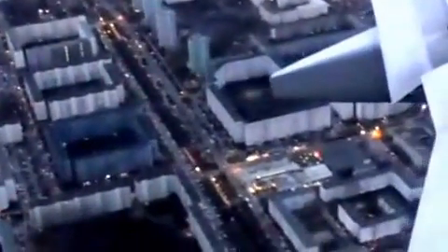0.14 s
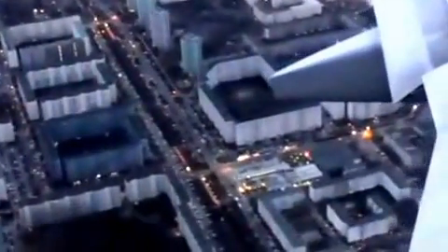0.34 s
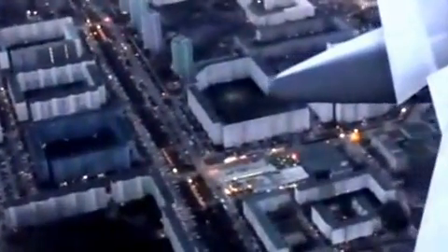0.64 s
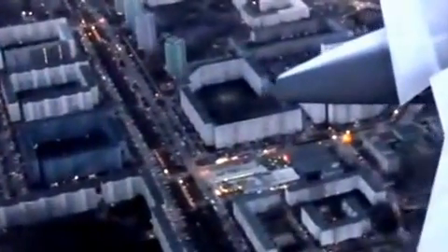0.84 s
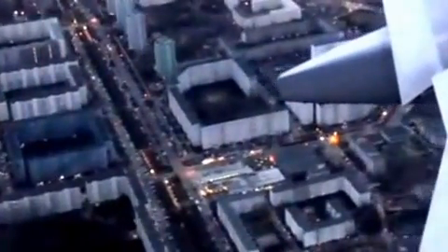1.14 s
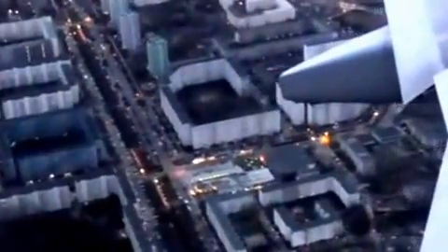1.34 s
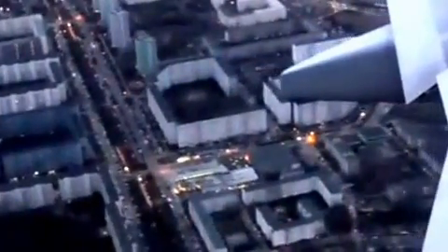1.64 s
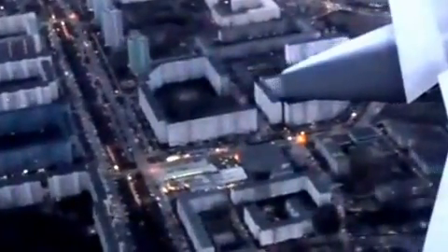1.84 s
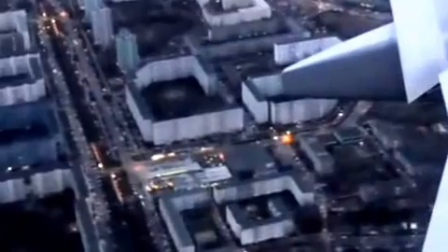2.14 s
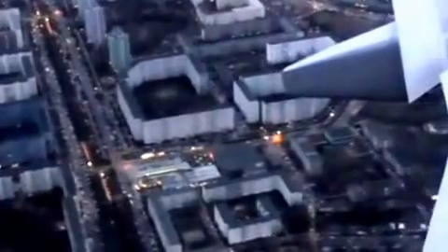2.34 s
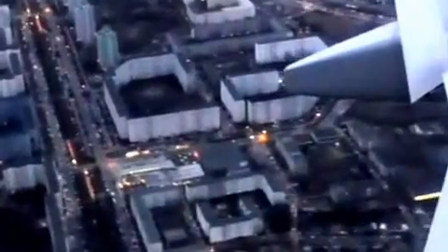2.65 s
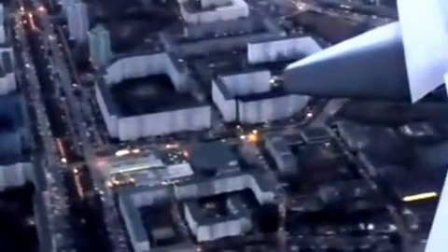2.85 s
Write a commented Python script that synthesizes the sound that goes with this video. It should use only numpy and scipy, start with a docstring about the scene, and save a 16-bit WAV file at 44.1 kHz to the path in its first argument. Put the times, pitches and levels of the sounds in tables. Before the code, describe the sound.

Low airliner cabin roar of engines and airflow, one sharp knock early, then faint plastic ticks

```python
"""Engines and airflow fill a descending jet airliner, close to a window, with a deep steady roar:
coloured noise with narrow resonances, swelling slightly in three bands.
Something hard clacks once nearby: decaying modes, a crack of noise and a short cabin tail.
Turning machinery adds faint wavering sines, and small plastic ticks sweep quickly upward.
The vents add a smooth faint hiss of treble noise."""
import sys
import numpy as np
from scipy import signal
from scipy.fft import rfft, irfft
from scipy.io import wavfile
from scipy.ndimage import uniform_filter1d

SR = 44100
rng = np.random.default_rng(int(sys.argv[2]) if len(sys.argv) > 2 else 0)


def wav_record(signal):
    """Record a signal, one row per channel, as 16-bit PCM in the file named by sys.argv[1]."""
    frames = np.transpose(np.atleast_2d(signal))
    bounded = np.clip(frames, -1, 1)
    # unit amplitude maps onto the largest positive 16-bit level
    quanta = np.round(bounded * 32767).astype(np.int16)
    wavfile.write(sys.argv[1], SR, quanta)


N = 131859
TIME = np.arange(N) / SR  # s
BIN_HZ = np.maximum(np.arange(N // 2 + 1) * SR / N, 1)  # kept above zero for the logarithm

# Relative spectrum of engine and airflow noise through the hull: [f/Hz, density level/dB per Hz]
ROAR_SPECTRUM = [(28, -38), (45, -25), (62, -19), (78, -8), (125, -0.5), (200, 0.14), (236, -2.5),
                 (295, -3.5), (335, -8), (370, -13.5), (480, -18.5), (570, -19.5), (630, -23), (860, -27),
                 (1120, -28.5), (1230, -33.5), (1380, -32.5), (1600, -36), (1860, -41.5), (2250, -44.5),
                 (2600, -51.5), (2900, -62.5)]
# Narrow bands in which panels and ducts resound: [f/Hz, half-amplitude width/Hz, level/dB]
RESONANCES = [(169.8, 15, -30.5), (208.3, 6.8, -32), (281, 34, -25.5), (503, 4.9, -46), (700, 14, -45.5),
              (901, 12, -51.5), (998, 36, -46.5), (2086, 150, -53), (3420, 160, -64)]
# Slow level of the roar's bass: [t/s, level/dB]
BASS_SWELL = [(0, 3), (0.13, -3.3), (0.25, 1.1), (0.42, -0.7), (0.8, -0.5), (0.98, 1.9), (1.28, -0.4),
              (1.48, -1), (1.66, 1), (1.78, -1.5), (1.92, 1.5), (2.2, -0.3), (2.75, -1), (2.88, 1),
              (2.99, 1.5)]
# Slow level of the drone between bass and midrange: [t/s, level/dB]
DRONE_SWELL = [(0, 0), (0.35, -1.5), (1.1, -0.5), (1.3, -1.2), (1.5, 1.5), (1.7, 0.4), (1.92, 1.8),
               (2.1, -3), (2.3, 2.5), (2.5, -2.5), (2.7, 0.7), (2.99, -1.3)]
# Slow level of the roar from the midrange up: [t/s, level/dB]
MIDRANGE_SWELL = [(0, 0.2), (0.25, 0), (0.45, -0.5), (0.75, -1.5), (1.0, 0.5), (1.25, -0.6), (1.5, 1.1),
                  (1.85, 1), (2.1, -1), (2.4, -1), (2.72, 1.5), (2.99, 0)]
# Contacts of the clack, a first touch, the blow and a dying rattle: [t/s, relative level/dB]
CLACK_CONTACTS = [(0.5511, -6), (0.5523, 0), (0.5542, -1.5), (0.5576, -8), (0.5608, -6.5), (0.5655, -13),
                  (0.5695, -14), (0.5755, -21), (0.5815, -21)]
# Modes of the struck body: [f/Hz, level/dB, t60/s]
CLACK_MODES = [(670, -25, .06), (765, -27, .035), (820, -21, .055), (962, -29, .045), (1125, -32, .05),
               (1285, -25, .04), (1604, -22.5, .05), (1910, -31, .035), (2065, -31, .045), (2135, -34, .04),
               (3480, -46, .04), (5360, -44, .04), (5690, -45, .04)]
# Relative spectrum of the crack and its tail: [f/Hz, density level/dB per Hz]
CRACK_SPECTRUM = [(450, 3), (700, 7), (1100, 6), (2000, 5), (2400, -8), (2900, -9), (3500, -4.5),
                  (5200, -2), (6200, -5.5), (7800, -13), (8500, -36)]
# Tones of the turning machinery: [f/Hz, level/dB]
MACHINE_TONES = [(449, -39), (1500, -52), (2997, -74.5)]
# Small plastic ticks: [t/s, level/dB]
TICK_CONTACTS = [(1.0625, -40), (1.1005, -37), (1.1255, -35.5), (1.619, -43.5), (1.625, -42.5),
                 (1.8944, -34.5), (1.9074, -33), (1.9597, -39.5), (2.9185, -37.5)]
# Relative spectrum of the ticks: [f/Hz, density level/dB per Hz]
TICK_SPECTRUM = [(1500, 0), (2800, -1), (3600, -1.5), (4250, 2), (5200, -2), (7000, 0.5), (8400, 0),
                 (9200, -6), (10300, -11), (11000, -30)]
# Relative spectrum of the air from the vents: [f/Hz, density level/dB per Hz]
HISS_SPECTRUM = [(2000, -15.5), (2700, -2), (3800, 1.5), (5400, -0.5), (6500, -5), (8000, -11),
                 (9500, -18.5), (11000, -28), (15000, -35.5)]
# Slow level of the hiss: [t/s, level/dB]
HISS_LEVEL = [(0, -55.5), (0.4, -54), (0.8, -56), (1.1, -55), (1.65, -54), (2.15, -55), (2.45, -56.5),
              (2.99, -53)]
# Left-right correlation of the roar and hiss: [f/Hz, correlation]
CORRELATION = [(100, 0.99), (210, .99), (330, 0.98), (500, 0.88), (800, .84), (1800, 0.82), (2700, 0.65),
               (5000, 0.59), (8000, 1)]
# Left-right balance of every noise: [f/Hz, left minus right level/dB]
BALANCE = [(90, .5), (210, -0.2), (500, -0.3), (770, -3), (1200, -2), (1800, -.5), (2700, 1.5), (8000, 0)]

ROAR_DB = -14  # broad noise before the swells
DRONE_FROM_HZ, MIDRANGE_FROM_HZ = 235, 355
STEADY_OVER_S = 0.2
CRACK_DB, CRACK_T60_S = -21.5, 0.018
CLACK_TAIL_DB, CLACK_TAIL_T60_S = -39, 0.17
TONE_WANDER_HZ, TONE_FLUTTER_DB = 2.8, 2  # rms deviations
TONE_DRIFT_CORNER_HZ = 5.9
TICK_RISE_S, TICK_T60_S = 0.0006, 0.013
TICK_TAIL_DB, TICK_TAIL_T60_S = -17.5, 0.16  # tail level relative to the snap
TICK_DELAY_S_PER_HZ = 1.7e-7
TICK_CORRELATION = 0.88
STOPBAND_HZ = 15700


def roar():
    """Turbulent noise excites resonances; the level of each of three bands varies slowly."""
    correlation = over_hz(CORRELATION)
    rumble = from_db(ROAR_DB) * noise(colour(ROAR_SPECTRUM), correlation)
    for hz, width, db in RESONANCES:
        resonance_gain = 1 / (1 + ((BIN_HZ - hz) / (width / 2)) ** 2)
        rumble = rumble + from_db(db) * noise(resonance_gain, correlation)
    bass = below(rumble, DRONE_FROM_HZ)
    lows = below(rumble, MIDRANGE_FROM_HZ)
    bass_part = from_db(over_time(BASS_SWELL)) * steady(bass)
    drone_part = from_db(over_time(DRONE_SWELL)) * steady(lows - bass)
    midrange_part = from_db(over_time(MIDRANGE_SWELL)) * (rumble - lows)
    return bass_part + drone_part + midrange_part


def clack():
    """Impact: contacts excite the decaying modes of a hard body, a crack and a short cabin tail."""
    ringing = np.zeros((2, N))
    for hz, db, t60 in CLACK_MODES:
        # the phase differs slightly between left and right
        phase = rng.uniform(0, 2 * np.pi) + rng.normal(0, 0.32, (2, 1))
        envelope = from_db(db) * strikes(CLACK_CONTACTS, rise_s=0.00019, t60=t60)
        ringing += envelope * np.sin(2 * np.pi * hz * TIME + phase)
    spectrum = colour(CRACK_SPECTRUM)
    crack_envelope = strikes(CLACK_CONTACTS, rise_s=0.00032, t60=CRACK_T60_S)
    crack = from_db(CRACK_DB) * crack_envelope * noise(spectrum, correlation=0.45)
    tail_envelope = strikes(CLACK_CONTACTS, rise_s=0.019, t60=CLACK_TAIL_T60_S)
    tail = from_db(CLACK_TAIL_DB) * tail_envelope * noise(spectrum, correlation=0.54)
    return ringing + crack + tail


def machinery():
    """Rotation gives pure tones; random modulation of frequency and amplitude makes them waver."""
    tones = np.zeros(N)
    for hz, db in MACHINE_TONES:
        frequency = hz + TONE_WANDER_HZ * drift(TONE_DRIFT_CORNER_HZ)
        phase = 2 * np.pi * np.cumsum(frequency) / SR
        flutter = from_db(TONE_FLUTTER_DB * drift(TONE_DRIFT_CORNER_HZ))
        tones += from_db(db) * rms_one(flutter * np.sin(phase))
    return tones


def ticks():
    """Dispersion: delay proportional to frequency turns each bright slip of plastic into an upsweep."""
    snap = strikes(TICK_CONTACTS, TICK_RISE_S, TICK_T60_S)
    tail = from_db(TICK_TAIL_DB) * strikes(TICK_CONTACTS, TICK_RISE_S, TICK_TAIL_T60_S)
    slips = np.hypot(snap, tail) * noise(colour(TICK_SPECTRUM), TICK_CORRELATION)
    dispersion = np.exp(-1j * np.pi * TICK_DELAY_S_PER_HZ * BIN_HZ ** 2)
    return irfft(rfft(slips) * dispersion, N)


def vents():
    """Flow noise: the cabin air gives a smooth, faint treble hiss whose level varies slowly."""
    hiss = noise(colour(HISS_SPECTRUM), over_hz(CORRELATION))
    return from_db(over_time(HISS_LEVEL)) * hiss


def noise(gain, correlation):
    """Mid and side noises, weighted by correlation, form a coloured stereo pair of unit rms."""
    mid, side = rfft(rng.standard_normal((2, N)))
    alike = np.clip(correlation, -1, 1)
    signs = np.array([[1], [-1]])  # left, right
    pair = np.sqrt(1 + alike) * mid + signs * np.sqrt(1 - alike) * side
    balance = from_db(signs * over_hz(BALANCE) / 2)
    return rms_one(irfft(pair * gain * balance, N))


def strikes(contacts, rise_s, t60):
    """Contacts add in power, each with a linear rise and an exponential decay of amplitude."""
    power = np.zeros(N)
    for start, db in contacts:
        age = np.maximum(TIME - start, 0)
        rise = np.minimum(age / rise_s, 1)
        decay_db = np.minimum(60 * age / t60, 200)
        power += (rise * from_db(db - decay_db)) ** 2
    return np.sqrt(power)


def steady(x):
    """Division by the running rms evens out slow swells and keeps the quick flutter."""
    power = uniform_filter1d(np.mean(x ** 2, axis=0), int(STEADY_OVER_S * SR))
    return x * np.sqrt(power.mean() / power)


def drift(corner_hz):
    """Low-pass filtering of white noise gives slow random motion of unit rms."""
    spectrum = rfft(rng.standard_normal(N))
    return rms_one(irfft(spectrum / (1 + (BIN_HZ / corner_hz) ** 2), N))


def below(x, hz):
    """A steep zero-phase low-pass splits the spectrum into bands."""
    return irfft(rfft(x) / (1 + (BIN_HZ / hz) ** 20), N)


def colour(points):
    """Spectral shaping: gain follows a dB table and falls steeply past its ends."""
    low_skirt = np.minimum(1, BIN_HZ / points[0][0]) ** 4
    high_skirt = np.minimum(1, points[-1][0] / BIN_HZ) ** 8
    return from_db(over_hz(points)) * low_skirt * high_skirt


def over_hz(points):
    """Interpolation of a table along logarithmic frequency."""
    hz, value = np.transpose(points)
    return np.interp(np.log(BIN_HZ), np.log(hz), value)


def over_time(points):
    """Linear interpolation of a table at every sample."""
    return np.interp(TIME, *np.transpose(points))


def from_db(db):
    """Amplitude ratio as the antilogarithm of a level in decibels."""
    return 10 ** (np.asarray(db) / 20)


def rms_one(x):
    """Normalisation to unit rms."""
    return x / np.sqrt(np.mean(x ** 2) + 1e-20)


def scene():
    """Superposition of all the sources heard from the seat."""
    return roar() + clack() + machinery() + ticks() + vents()


def record(dry):
    """A steep low-pass removes the top of the treble, 70 dB down from the stopband edge."""
    low_pass = signal.cheby2(12, 70, STOPBAND_HZ, fs=SR, output="sos")
    return signal.sosfilt(low_pass, dry)


dry = scene()
out = record(dry)
wav_record(out)
```